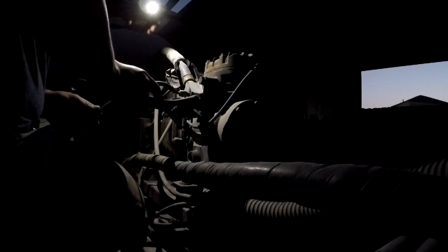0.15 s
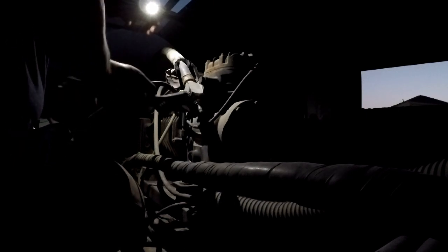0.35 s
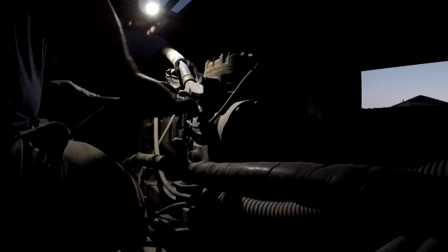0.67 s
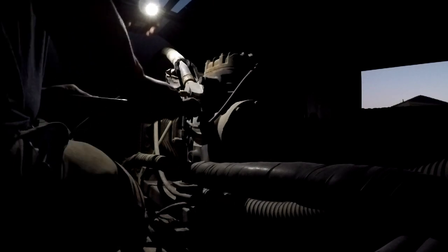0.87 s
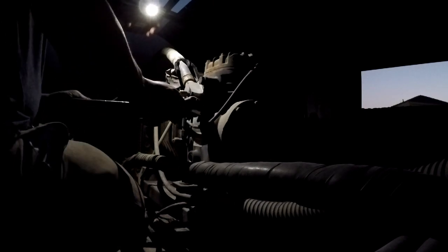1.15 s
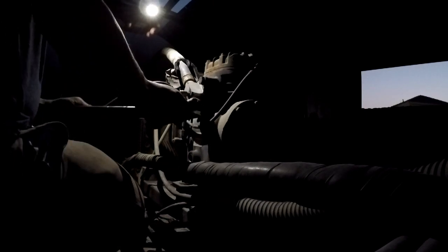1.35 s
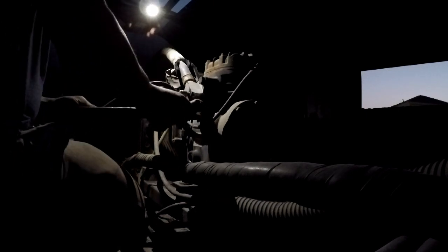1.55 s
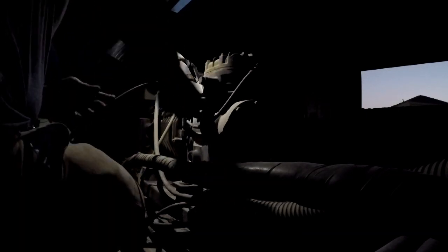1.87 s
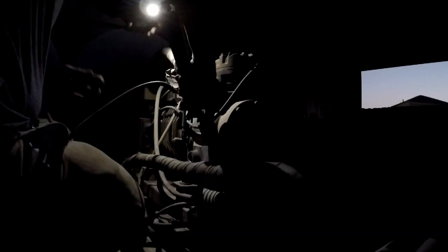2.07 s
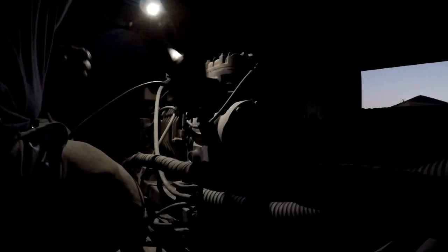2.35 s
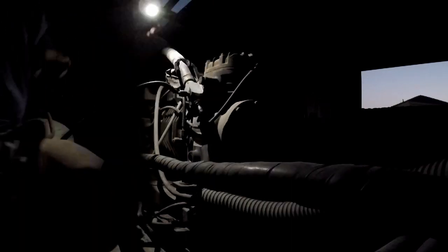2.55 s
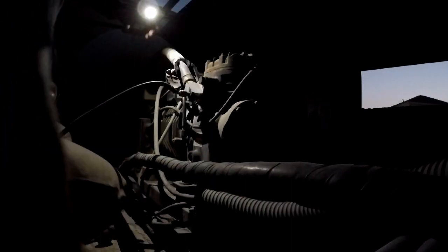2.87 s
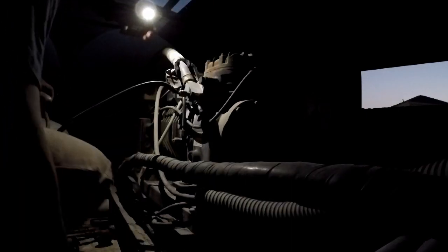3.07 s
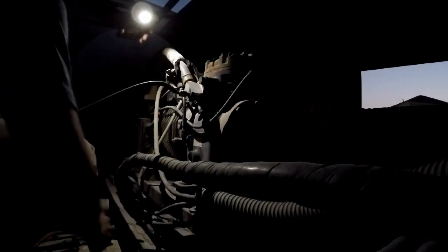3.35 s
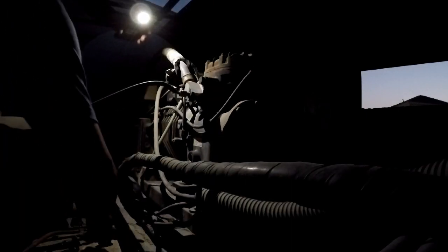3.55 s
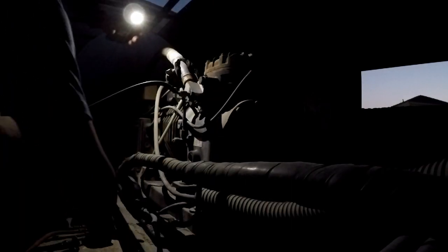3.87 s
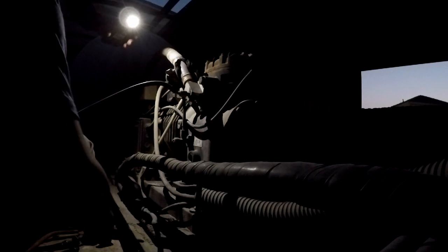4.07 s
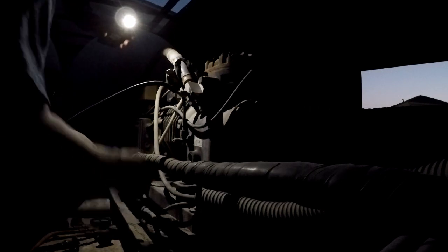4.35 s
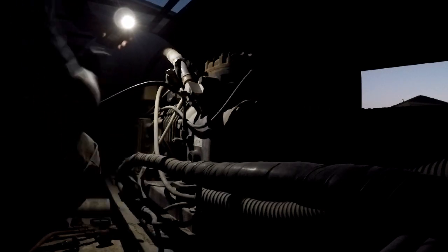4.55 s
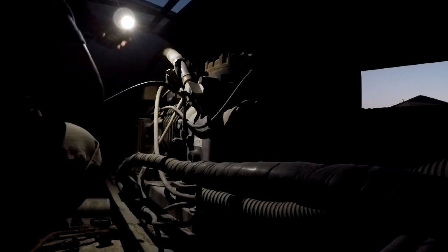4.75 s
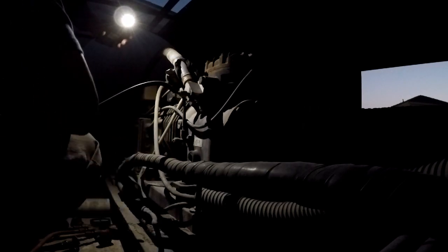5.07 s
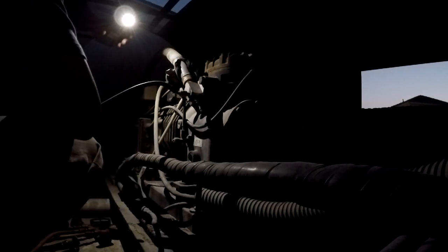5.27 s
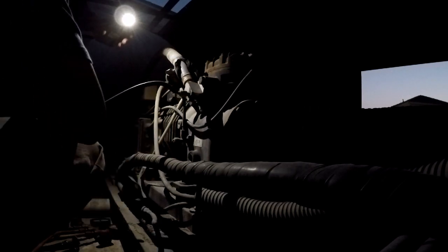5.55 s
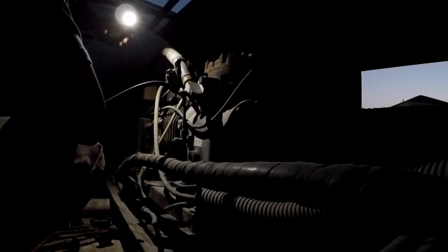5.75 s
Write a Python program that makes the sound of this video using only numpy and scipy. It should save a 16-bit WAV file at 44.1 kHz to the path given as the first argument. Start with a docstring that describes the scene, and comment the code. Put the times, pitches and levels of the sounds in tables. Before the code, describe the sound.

A piston engine runs at constant speed close by in a shed, with low hum, rapid repeating valve knocks and breathy mechanical hiss. Soft wind gusts thump the small camera's microphone. At about 3.2 seconds a steel tool clinks loudly on metal over a low thud; the engine dips briefly, then recovers. Stereo narrows to nearly mono, opening slightly at the end.

```python
"""Piston engine in a shed

A piston engine runs steadily, heard by a small camera: sine lines hum and noise bursts knock over gas hiss.
Filtered noise rumbles as wind gusts swell it, so the camera fades from its stereo pair to one sheltered
microphone, and near the end partly back. Once a steel tool clinks on metal and rings as decaying modes over
a low thud of swelling rumble; the gain control ducks under it."""
import sys
import numpy as np
from scipy import signal
from scipy.fft import rfft, irfft
from scipy.io import wavfile
from scipy.ndimage import uniform_filter1d

SR = 44100
rng = np.random.default_rng(int(sys.argv[2]) if len(sys.argv) > 2 else 0)


def voltage_ratio(decibels):
    """Convert decibels (scalar or array-like) to amplitude ratios, 20 dB per decade."""
    exponent = np.asarray(decibels, float) / 20
    return 10 ** exponent


def generate_wav(signal):
    """Clip the signal to [-1, 1] and save it as 16-bit WAV at the path in sys.argv[1]."""
    frames = np.transpose(np.atleast_2d(signal))
    scaled = np.clip(frames, -1, 1) * 32767
    pcm = np.round(scaled).astype(np.int16)
    wavfile.write(sys.argv[1], SR, pcm)


N = 261072


def evened(x):
    """Normalisation: scales a signal to an rms of 1."""
    return x / np.sqrt(np.mean(x ** 2) + 1e-20)


def curve(rows):
    """Linear interpolation: the columns of a time table at every sample."""
    s, *columns = np.transpose(rows)
    return [np.interp(np.arange(N) / SR, s, c) for c in columns]


def colour(x, points):
    """Spectral shaping: filters by gains in dB, interpolated over log frequency."""
    hz, db = np.transpose(points)
    bins = np.fft.rfftfreq(len(x), 1 / SR) + 1
    gain_db = np.interp(np.log(bins), np.log(hz + 1), db)
    return irfft(rfft(x) * voltage_ratio(gain_db), len(x))


def wander(per_s):
    """Slow random modulation: straight lines between normal random knots, per_s of them a second."""
    knots = rng.standard_normal(300)
    return np.interp(np.arange(N) / SR * per_s, np.arange(300), knots)


# speed of the engine: time_s, working_cycles_per_s
CYCLE_SPEED = [(0, 14.654), (5.92, 14.643)]


def cycles_turned():
    """Phase as the integral of speed: working cycles completed at each sample."""
    return np.cumsum(curve(CYCLE_SPEED)[0]) / SR


# hum frequencies as multiples of the working cycle: multiple
HUM_MULTIPLES = [4, 8, 10, 16, 20, 24, 26, 28, 36, 40, 44, 46, 48, 56, 60, 64, 70, 82, 108, 114, 122]
# nominal rms of each hum line; rows: sheltered microphone, pair sum, pair side; one column a line: level_db
HUM_LEVELS = [
    [-31, -34, -41, -24, -36, -36, -41, -39, -35, -43, -45, -44, -43, -39, -34, -42, -40, -42, -47, -41,
     -46],
    [-40, -31, -32, -27, -39, -38, -35, -38, -36, -48, -46, -42, -42, -39, -33, -48, -46, -47, -47, -36,
     -55],
    [-36, -37, -36, -34, -49, -45, -43, -49, -43, -56, -46, -53, -43, -39, -34, -45, -50, -50, -49, -43,
     -61],
]
# lines of mains and fan, not tied to the cycle: pitch_hz, sheltered_db, pair_sum_db, pair_side_db
MAINS_AND_FAN = [(72.8, -30, -32, -40), (109.2, -27, -32, -40), (120, -25, -27, -33), (240, -37, -38, -45)]


def hum(bass_db):
    """Harmonic radiation: wavering sine lines of the machine, with those of mains and fan, in three views."""
    gap_s = 0.0003  # sound reaches the sheltered microphone this much later
    turns, t = cycles_turned(), np.arange(N) / SR
    lines = [(k * CYCLE_SPEED[0][1], k * turns, db)
             for k, db in zip(HUM_MULTIPLES, np.transpose(HUM_LEVELS))]
    lines += [(hz, hz * t, db) for hz, *db in MAINS_AND_FAN]
    out = np.zeros((3, N))
    for hz, phase, db in lines:
        lag = np.array([[hz * gap_s], [0], [1 / 4]])  # the side lags by a quarter turn
        phase = phase + rng.random() + 0.024 * wander(3.38) - lag
        waver = voltage_ratio(0.7 * wander(5) + bass_db * (hz < 300))
        out += voltage_ratio(db)[:, None] * np.sqrt(2) * waver * np.sin(2 * np.pi * phase)
    return out


# valve knocks in each cycle, levels before band filtering, over unit white noise:
# place_in_cycle (0-1), level_db, t60_s, centre_hz, width_hz
VALVE_KNOCKS = [(0.889, 7.5, 0.078, 2840, 2450), (.9, 10.5, 0.076, 1790, 730), (0.921, 9, 0.02, 6100, 5960),
                (.03, 7.5, 0.054, 2190, 2800), (.05, 9.5, 0.035, 12500, 7100), (.13, 9, 0.041, 6840, 3960),
                (0.131, 5.5, 0.031, 1800, 2220), (0.551, 3, 0.051, 7850, 6000),
                (0.623, 2.5, 0.023, 1650, 1190), (.64, 7, 0.037, 6900, 4000)]
# narrow resonances of casing and pipes: centre_hz, width_hz, lift_db
CASING_RESONANCES = [(1263, 19, 6.5), (1434, 180, 0.5), (1500, 210, 2), (1790, 56, 4), (2315, 5.7, 12.5),
                     (2555, 89, 4), (2884, 38, 6.5), (3414, 260, 1.5), (4010, 28, 9), (4380, 36, 4.5),
                     (4705, 30, 7.5), (5040, 35, -2.5), (5730, 59, 8.5), (6000, 28, 4.5), (7020, 53, 6.5),
                     (7160, 70, -2), (11900, 180, -8.5), (13300, 250, 6)]
# spectrum of the machine hiss; sheltered microphone, pair sum, pair side: frequency_hz, relative_db_per_hz
HISS_SPECTRA = [
    [(260, -52), (450, -18), (540, -0.5), (634, -9.5), (866, -3), (1440, -12.5), (1950, -12.5),
     (2300, -21.5), (3850, -24.5), (4150, -18), (5900, -24), (7100, -28.5), (8300, -34), (15700, -45.5)],
    [(260, -37), (450, -4.5), (615, -5.5), (879, -5), (1690, -13), (2500, -15), (2700, -18.5),
     (5300, -22.5), (5750, -19), (7400, -24.5), (8300, -36.5), (10000, -32), (12000, -39.5), (15700, -41)],
    [(260, -34), (450, -4), (866, -3.5), (1200, -9.5), (1640, -11), (2500, -19), (3400, -30), (4200, -32),
     (5300, -26), (5800, -22), (7400, -27), (8430, -34), (15700, -39)],
]
# nominal hiss level before the mix weights, in the same three views: level_db
HISS_LEVELS = [-26, -27, -29.5]
# change of the highest knock, softer in the pair, in the same three views: change_db
TICK_CHANGES = [-0.5, -3, -9]


def hiss(view):
    """Turbulent and impulsive excitation: gas noise and valve bursts ring in casing resonances."""
    alike = 0.9  # part of each burst that repeats from cycle to cycle
    turns, t = cycles_turned(), np.arange(3000) / SR
    bins = np.fft.rfftfreq(N, 1 / SR)
    out = rng.standard_normal(N)
    for place, db, t60, hz, width_hz in VALVE_KNOCKS:
        highest = hz > 10000
        spread_db = 3.5 if highest else 0.8  # the highest tick is the most uneven
        count = np.floor(turns - place + 1)
        strike_db = db + TICK_CHANGES[view] * highest + spread_db * rng.standard_normal(100)
        strikes = np.diff(count, prepend=count[0]) * voltage_ratio(strike_db)[count.astype(int)]
        decay = voltage_ratio(-60 * t / t60) * np.minimum(t / 0.0014, 1)
        same = signal.oaconvolve(strikes, decay * rng.standard_normal(len(t)))[:N]
        fresh = signal.oaconvolve(strikes, decay)[:N] * rng.standard_normal(N)
        burst = alike * same + np.sqrt(1 - alike ** 2) * fresh
        band = np.exp(-2 * ((bins - hz) / width_hz) ** 2)
        out += irfft(rfft(burst) * band, N)
    lift_db = sum(db / (1 + (2 * (bins - hz) / width_hz) ** 2) for hz, width_hz, db in CASING_RESONANCES)
    rung = irfft(rfft(out) * voltage_ratio(lift_db), N)
    level_db = HISS_LEVELS[view] + 0.86 * wander(9.9)
    return voltage_ratio(level_db) * evened(colour(rung, HISS_SPECTRA[view]))


# modes of the steel tool: pitch_hz, level_db, t60_s,
# family (0 follows the knock level, 1 the slide level, 2 the crack level)
STEEL_MODES = [(3836, 0, .33, 0), (3943, -20, .3, 0), (2400, -4, 1.5, 2), (2322, -15, .5, 2),
               (4535, -30, .6, 0), (6494, -20, .1, 0), (6855, -25, .2, 0), (7203, -23, .15, 0),
               (7358, -26, .15, 0), (7728, -23, .3, 0), (11616, -29, .3, 0), (11723, -33, .3, 0),
               (15506, -32, .3, 0), (15400, -37, .3, 0), (5453, 0, .9, 1), (1562, -15, .4, 1),
               (9343, -21, .6, 1), (13233, -26, .6, 1), (10110, -29, .3, 1), (14000, -31, .3, 1)]
# crack of many small modes, drawn as noise: frequency_hz, relative_db_per_hz
CRACK_SPECTRUM = [(600, -30), (1500, -19), (3000, -5), (6500, 7), (8000, -6), (8800, -11), (15500, -17)]
# swells of the steel ring: three quick rises, the main blow, a slower swell, faint tails:
# start_s, knock_db, slide_db, crack_db, rise_s, length_s
RING_SWELLS = [(3.223, -23, -40, -42, 0.0054, 0.013), (3.234, -11, -25, -36, 0.0065, 0.022),
               (3.246, 0, -11, -31, 0.006, 0.0065), (3.254, 5, -14, -15, 0.0075, 0.096),
               (3.268, -40, 0.5, -48, 0.027, 0.045), (3.324, -50, -25, -30, .006, 0.06),
               (3.37, -34, -35, -34.5, .008, 0.11)]


def tool():
    """Modal decay: the steel rings in short swells, each with a noise tick and a short tail."""
    out = np.zeros(N)
    for s, knock_db, slide_db, crack_db, rise, length in RING_SWELLS:
        t = np.arange(round(length * SR)) / SR
        ramp = np.minimum(t / rise, (length - t) / (0.48 * length))
        shape = np.sin(np.pi / 2 * np.clip(ramp, 0, 1))
        family_db = (knock_db, slide_db, crack_db)
        ring = sum(voltage_ratio(family_db[round(family)] + db - 60 * t / t60)
                   * np.sin(2 * np.pi * (hz * t + rng.random())) for hz, db, t60, family in STEEL_MODES)
        noise = evened(colour(rng.standard_normal(len(t)), CRACK_SPECTRUM))
        tail = voltage_ratio(crack_db - 60 * t / 0.25)
        tick = voltage_ratio(crack_db + 6.5 - 60 * t / 0.036)
        crack = (tail + tick) * noise * np.minimum(shape * 3, 1)
        out[round(s * SR):][:len(t)] += shape * ring + crack
    return out


# spectrum of the deep rumble: frequency_hz, relative_db_per_hz
RUMBLE_SPECTRUM = [(9, -38), (15, -2), (60, 5), (95, 4), (140, 0), (225, -2), (260, -28), (340, -21.5),
                   (570, -120)]
# spectrum of the broad boom of the shed: frequency_hz, relative_db_per_hz
BOOM_SPECTRUM = [(120, -52), (200, -1), (231, -1.5), (270, -2.5), (295, 0.5), (310, 0), (327, 2), (345, -2),
                 (483, -4), (532, -6), (640, -23.5), (830, -16), (1410, -120)]


def lows(steady_db, boom_db, swell_power):
    """Addition of powers: low swells raise both the lumpy rumble and the broad boom of the shed."""
    top_db = -7  # share of a swell that reaches up into the boom
    rumble = evened(colour(rng.standard_normal(N), RUMBLE_SPECTRUM)) * voltage_ratio(1.9 * wander(16))
    boom = evened(colour(rng.standard_normal(N), BOOM_SPECTRUM)) * voltage_ratio(0.78 * wander(13))
    rumble_gain = np.sqrt(voltage_ratio(2 * steady_db) + swell_power)
    boom_gain = np.sqrt(voltage_ratio(2 * boom_db) + swell_power * voltage_ratio(2 * top_db))
    return rumble * rumble_gain + boom * boom_gain


# low swells: wind gusts, and near 3.25 s the low thud under the clink:
# peak_s, length_s (four standard deviations), rumble_db
LOW_SWELLS = [(0.39, 0.2, -21), (.67, 0.049, -10.5), (0.882, 0.19, -16.5), (1.175, 0.22, -20),
              (1.505, 0.28, -18), (2.02, 0.72, -17), (2.186, 0.046, -16.5), (2.556, 0.087, -17),
              (2.687, 0.15, -21), (3.03, 0.21, -15), (3.245, 0.066, -9), (3.296, 0.11, -9.5),
              (3.75, 0.046, -14.5), (4.16, 0.085, -14), (5.412, 0.076, -30)]


def gusts_and_thud():
    """Gaussian envelopes: the power of each wind gust, and of the thud, swells and sinks as a bell curve."""
    t = np.arange(N) / SR
    return sum(voltage_ratio(db) ** 2 * np.exp(-0.5 * (4 * (t - s) / length) ** 2) for s, length, db in LOW_SWELLS)


def held(power_db, db_per_s, knee_db):
    """Peak holding: excess over the knee, caught at once and let go at a steady pace."""
    fall = np.arange(N) * db_per_s / SR
    envelope_db = np.maximum.accumulate(power_db + fall) - fall
    return np.maximum(envelope_db - knee_db, 0)


# course of the bass: time_s, change_db (hum lines under 300 Hz and steady rumble), boom_db
BASS_COURSE = [(0, 1.5, -20.5), (1.15, 1, -26.5), (1.27, -8, -32.5), (1.75, -8, -29.5), (2.2, -5, -33),
               (2.26, -12, -43), (2.5, -5.5, -36), (2.66, -9.5, -22), (3.05, -8.5, -22), (3.14, -2, -34),
               (3.65, -6, -22), (4.1, 2.5, -21), (5.92, 0.5, -22)]
# weights of the microphones in the mix: time_s, stereo_pair_db, sheltered_db
MICROPHONE_WEIGHTS = [(0, 2, -43), (.9, 0.5, -43), (1.1, -5, -11), (1.3, -11.5, -6), (1.7, -18.5, -1.5),
                      (2.2, -21, 0), (2.3, -46, -0.5), (5.5, -50, 0), (5.62, -16, 0.5), (5.92, -6.5, -2)]


def scene():
    """Superposition: sources add in sum and side as the pair yields to the sheltered microphone."""
    bass_db, boom_db = curve(BASS_COURSE)
    steady_db, swell_power = -20 + bass_db, gusts_and_thud()
    pair, sheltered = voltage_ratio(curve(MICROPHONE_WEIGHTS))
    single, mid, side = hum(bass_db) + [hiss(view) for view in range(3)]
    centre = sheltered * single + pair * mid
    centre = centre + lows(steady_db, boom_db, swell_power) + tool()
    # the swells differ most between the ports
    side = pair * (side + lows(steady_db - 2, boom_db - 4.5, 1.5 * swell_power))
    # the right channel gets more of the low middle, around 600 Hz
    lean = pair * colour(centre, [(30, -28), (200, -15.5), (600, -7), (1000, -34)])
    return np.array([centre + side - lean, centre - side + lean])


def top_cut(x):
    """Nothing passes above the cut-off."""
    return signal.sosfilt(signal.butter(12, 15890, fs=SR, output="sos"), x)


def record(dry):
    """Dynamic compression: gain control follows treble power, ducks fast and recovers slowly."""
    self_noise_db = -66  # white hiss of the camera's electronics, before the soft overload
    highpass = signal.butter(2, 1500, "highpass", fs=SR, output="sos")
    treble = signal.sosfilt(highpass, dry.mean(0))
    power_db = 10 * np.log10(abs(uniform_filter1d(treble ** 2, size=400)) + 1e-12)
    # a slow and a quick recovery
    over_db = 0.34 * held(power_db, 14.3, -15) + 0.38 * held(power_db, 117, -14.5)
    ducked = dry / voltage_ratio(uniform_filter1d(over_db, size=600, origin=250))
    ducked = ducked + voltage_ratio(self_noise_db) * rng.standard_normal(N)
    mix = 0.92 * np.tanh(ducked / 1.01)  # soft overload on peaks
    return top_cut(mix)


dry = scene()
out = record(dry)
generate_wav(out)
```